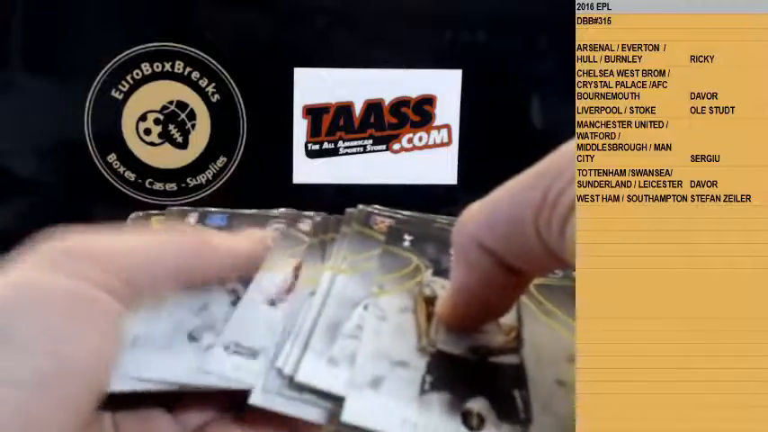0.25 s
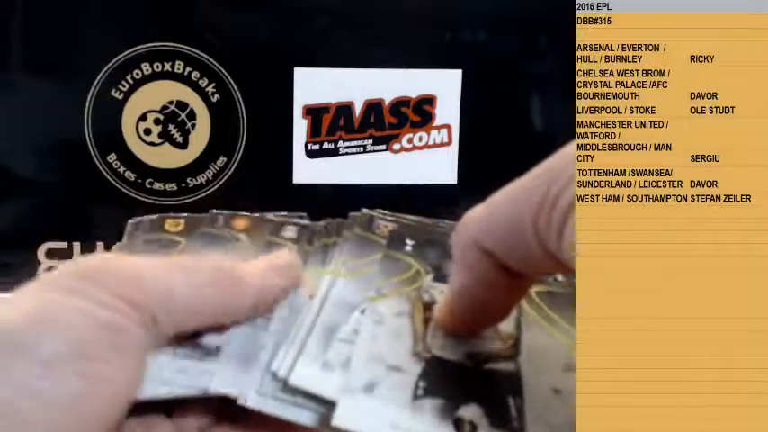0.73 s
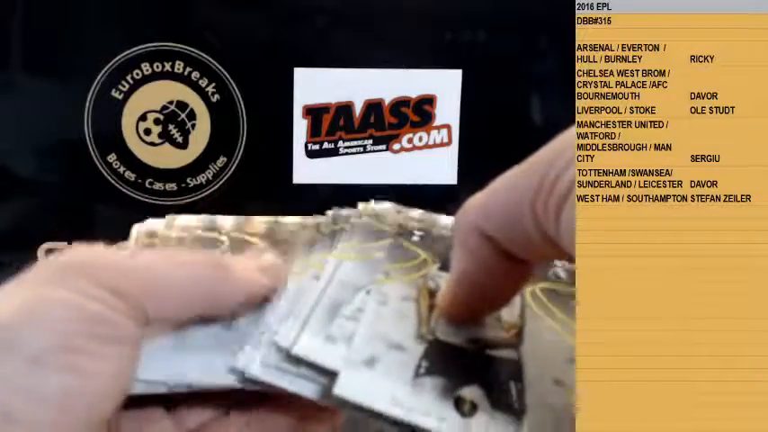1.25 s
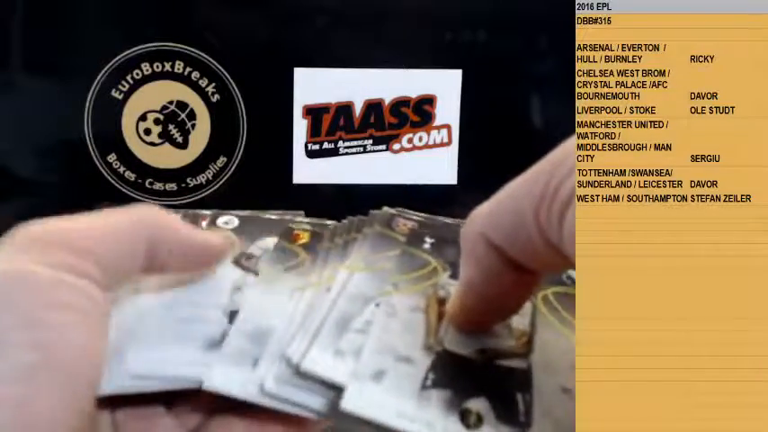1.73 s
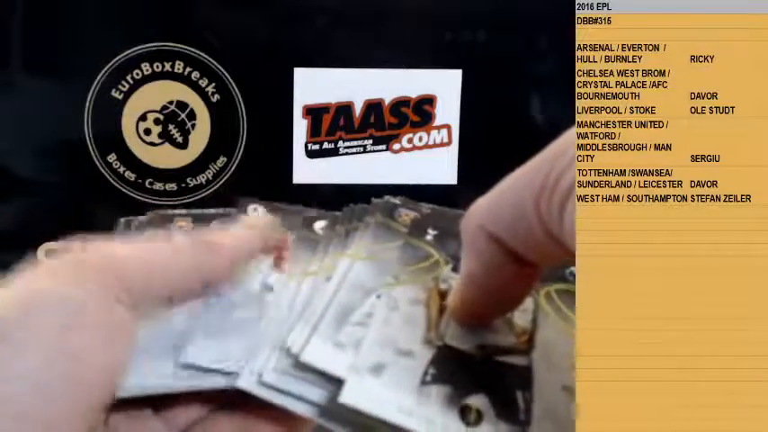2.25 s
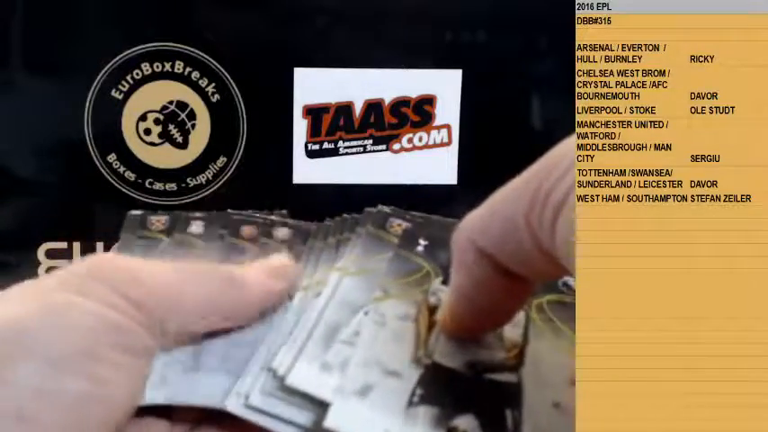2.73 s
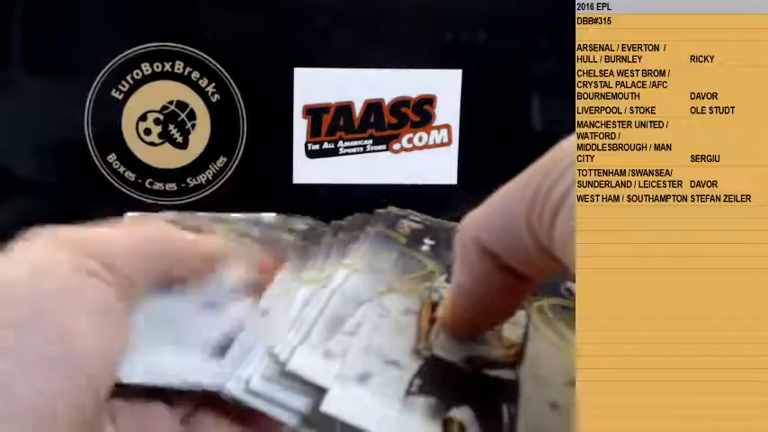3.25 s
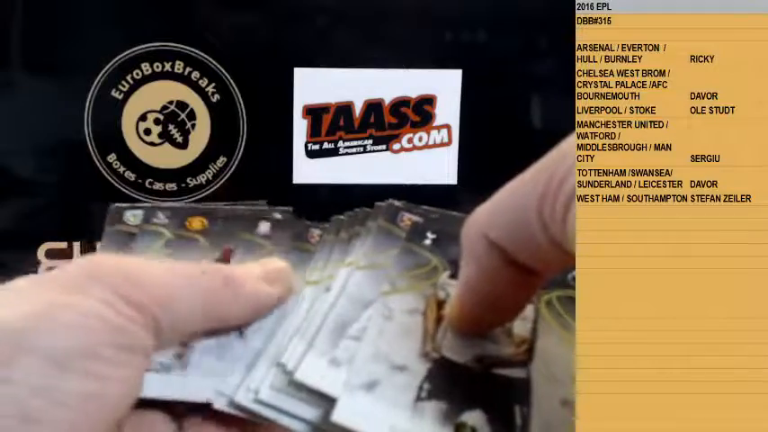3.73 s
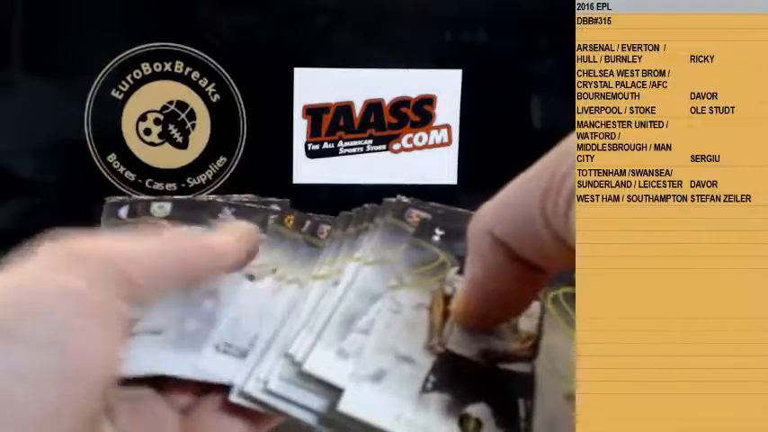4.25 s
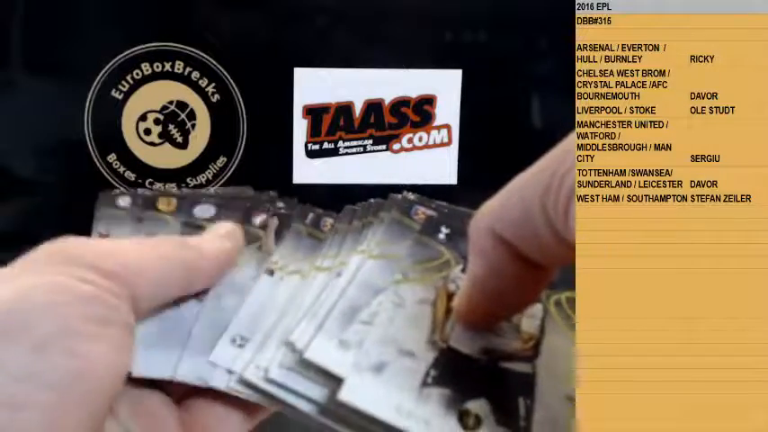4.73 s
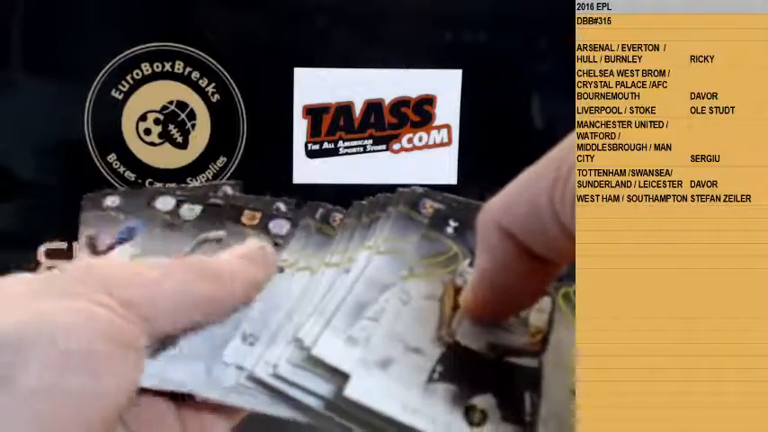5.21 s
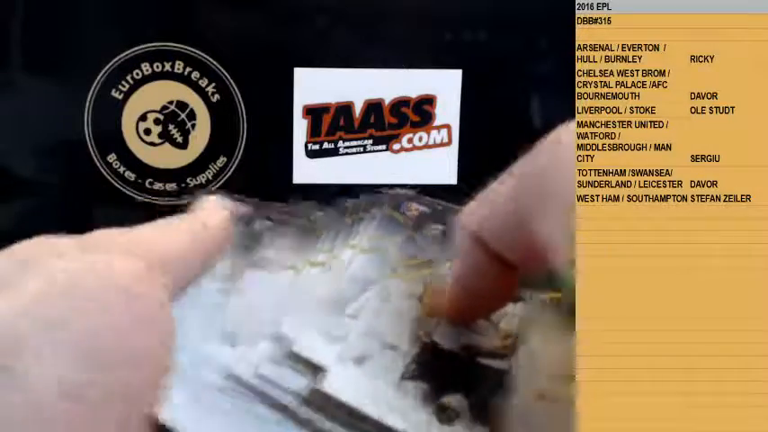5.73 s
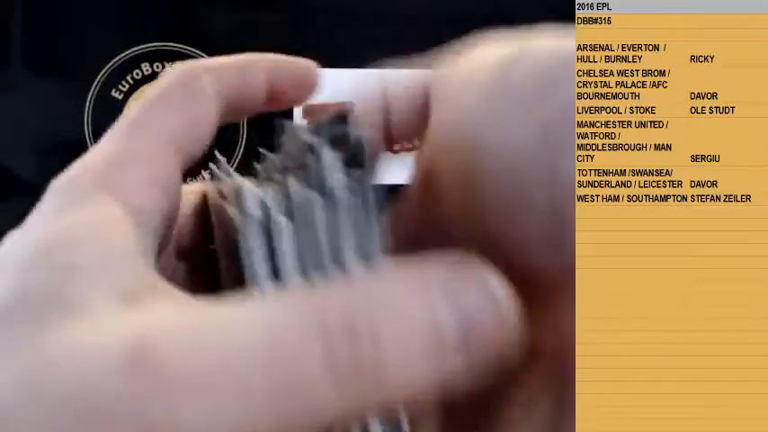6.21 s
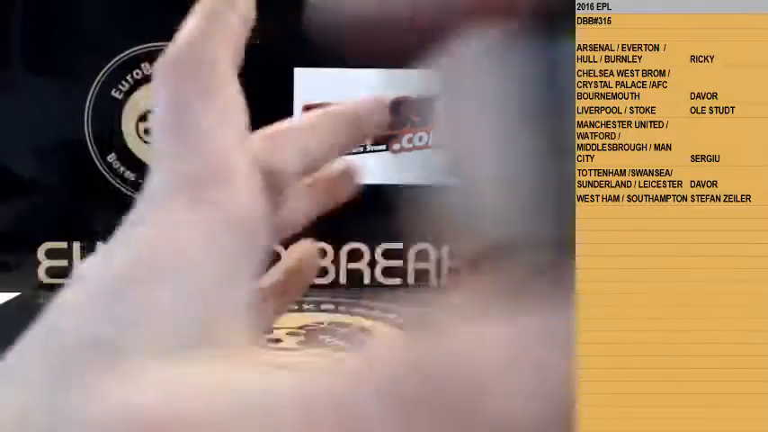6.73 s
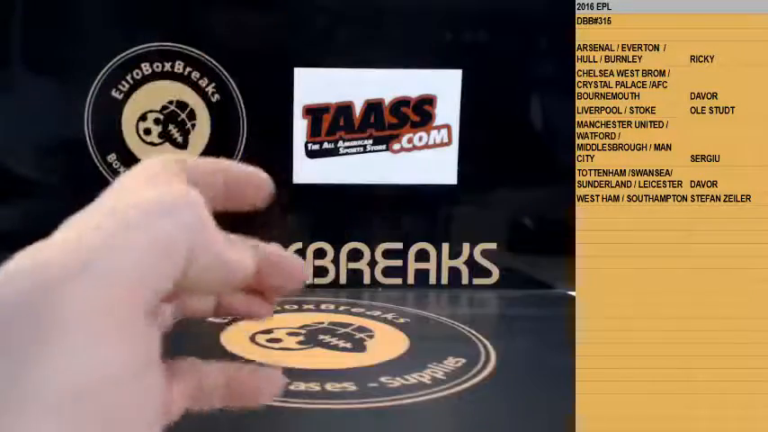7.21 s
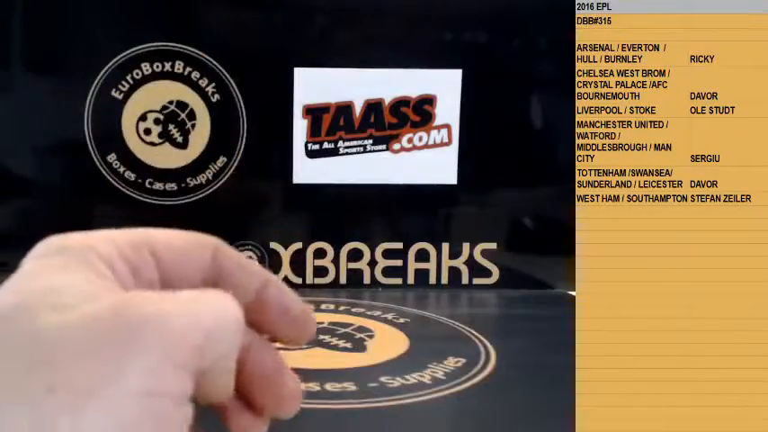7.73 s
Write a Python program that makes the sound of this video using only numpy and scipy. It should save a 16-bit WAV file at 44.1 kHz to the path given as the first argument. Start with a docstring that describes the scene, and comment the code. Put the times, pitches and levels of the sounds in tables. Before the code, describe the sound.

Trading cards rustle and tick faintly as they are flicked through, followed by one loud knock on a table in a quiet room.

```python
"""Leafing through trading cards

Close to a small stereo microphone in a quiet room, a thumb leafs through a fan of stiff cards.
Each card snaps free at its edge, pushes a puff of air and slides over the next. The stack is squared
up and knocked down on the ringing table, and the hand brushes away. A fan drones faintly behind."""
import sys
import numpy as np
from scipy import signal
from scipy.fft import rfft, irfft
from scipy.io import wavfile
from scipy.ndimage import map_coordinates

SR = 44100
rng = np.random.default_rng(int(sys.argv[2]) if len(sys.argv) > 2 else 0)


def wrap_up_sound(samples):
    """Save the sound to the file named by the first command line argument, as 16-bit audio."""
    columns = np.atleast_2d(samples).T
    # keep every value between -1 and 1, then stretch to whole-number steps
    tamed = np.clip(columns, -1, 1)
    steps = np.round(tamed * 32767).astype(np.int16)
    wavfile.write(sys.argv[1], SR, steps)


N = 351036
TIME, FREQS = np.arange(N) / SR, np.fft.rfftfreq(N, 1 / SR)

# Strokes of the thumb: (start [s], length [s], crest [share of length], crest level [dB],
# swell to the crest [dB], card body [dB re level], fizz [dB re level], stirred air [dB])
THUMB_STROKES = [ (0.0, 0.11, 0.091, -59, -22, -0.5, -1, -54),
                 (0.208, 0.13, 0.65, -61.5, -2.5, -3, -1, -51),
                 (0.311, 0.16, 0.073, -63.5, 0, -3, -4, -53.5),
                 (0.471, 0.23, 0.45, -58, 9, -4.5, -0.5, -56),
                 (0.796, 0.17, 0.33, -53.5, 8.5, -3.5, -1, -53.5),
                 (1.072, 0.22, 0.77, -59, 3.5, -2, -1, -56), (1.352, 0.16, 0.81, -62.5, -1.5, -6, -4, -60),
                 (1.486, 0.038, 0.38, -56, 21, 4.5, 7.5, -53),
                 (1.654, 0.18, 0.89, -60.5, 2.5, -4, -1, -53.5),
                 (1.933, 0.23, 0.09, -58.5, 3, -0.5, 3, -56.5), (2.24, 0.084, 0.17, -54, 6, -4, -1, -61),
                 (2.32, 0.095, 0.71, -60.5, 0, 2, 3, -56), (2.527, 0.23, 0.061, -60.5, 10, -1, 3, -53.5),
                 (2.814, 0.2, 0.57, -63, 3.5, 3.5, 2.5, -59), (3.118, 0.18, 0.45, -53, 25.5, -2, 1.5, -66),
                 (3.471, 0.12, 0.27, -58, 31, -2, 0.5, -45.5), (3.557, 0.36, 0.048, -68.5, 9, 2, 2, -70),
                 (3.9, 0.092, 0.4, -56, 20, 0.5, 3.5, -53), (3.976, 0.19, 0.072, -67.5, 0, 1, 1, -64),
                 (4.207, 0.16, 0.24, -55, 24, -4, 3, -48.5), (4.529, 0.095, 0.32, -62, 6, 0.5, 0.5, -58),
                 (4.597, 0.058, 0.63, -54, 19, -4, 3.5, -54), (4.819, 0.073, 0.43, -56.5, 12, -0.5, 1, -47),
                 (4.905, 0.12, 0.77, -63, 7, -0.5, 1, -62), (5.281, 0.16, 0.056, -56, 17, -3.5, -1, -53),
                 (5.38, 0.11, 0.62, -57, 28, -10, -6.5, -71), (5.498, 0.16, 0.74, -62, 5, -1, -4, -69),
                 (5.625, 0.21, 0.29, -52, 11.5, 1.5, 0, -56), (5.794, 0.11, 0.37, -50, 2, -1, -1.5, -67),
                 (5.894, 0.37, 0.43, -50.5, 14, -3, -0.5, -69), (6.196, 0.14, 0.67, -51.5, 10, -2, 5, -59),
                 (6.333, 0.096, 0.81, -47.5, 13.5, 1, 0.5, -62), (6.482, 0.11, 1, -57, 2, 0.5, 1.5, -53),
                 (6.644, 0.14, 0.71, -58, 15, 6.5, -2.5, -87), (6.769, 0.23, 0.57, -63, 8, 5, 1, -72),
                 (6.979, 0.14, 0.9, -58.5, 1.5, 2.5, -3, -53.5), (7.36, 0.11, 0.81, -53, 12, 2, -3, -40),
                 (7.461, 0.087, 0.33, -42, 6, -4.5, -8.5, -52),
                 (7.559, 0.097, 0.31, -50.5, 3, 0.5, -1.5, -68),
                 (7.64, 0.07, 0.58, -44.5, 20.5, -5, 3.5, -75), (7.72, 0.09, 0.43, -54.5, 8, 1, -9, -77),
                 (7.786, 0.065, 0.42, -46.5, 15, -3, -4.5, -67), (7.883, 0.11, 0.31, -57, 23, 6, -4.5, -70)]


def card_slides(catches_per_s=380, catch_db=-1, spread_db=4, judder_db=1.92, likeness=0.51):
    """Card rubs on card close to the microphone: smooth hiss and tiny catches under a juddering thumb."""
    # Colour of card on card: (frequency [Hz], spectral level [dB])
    rub_spectrum = [(260, -35.5), (450, 6.5), (569, -11), (692, -11), (942, -4.5), (1560, -8.5), (1900, -6),
                    (2050, -4.5), (2290, -1), (3110, 0), (3880, -6), (4790, -4), (6350, -3), (7370, -6.5),
                    (8540, -23), (11100, -44), (18800, -120)]
    catch_sizes = gain_of(spread_db * np.minimum(rng.exponential(1, N), 4))
    catches = catch_sizes * (rng.random(N) < catches_per_s / SR)
    hiss = rng.standard_normal((2, N))
    grit = hiss + gain_of(catch_db) * unit_rms(catches * rng.choice([-1., 1.], (2, N)))
    grit[1] = likeness * grit[0] + np.sqrt(1 - likeness ** 2) * grit[1]
    grit = coloured(grit * gain_of(judder_db * wander(rate_hz=28.8)), rub_spectrum)
    pressures = np.zeros((3, N))
    for start, length, crest, db, swell_db, body_db, fizz_db, _ in THUMB_STROKES:
        gains = gain_of(db + np.array([[body_db], [0], [fizz_db]]))
        add(pressures, start, gains * stroke_pressure(length, crest, swell_db))
    body, rub, fizz = band(grit, 583, 1887), band(grit, 1638, 4150), band(grit, 4220, 14000)
    return sum(pressure * unit_rms(part) for pressure, part in zip(pressures, (body, rub, fizz)))


def stroke_pressure(length, crest, swell_db, grip_s=0.0054, fade_db=13.5, let_go_s=0.012):
    """A stroke grips quickly, swells to its crest, fades as the card runs out, and lets go."""
    t = np.arange(0, length, 1 / SR)
    arch_db = np.interp(t / length, [0, np.clip(crest, .02, .98), 1], [-swell_db, 0, -fade_db])
    return gain_of(arch_db) * np.minimum(t / grip_s, 1) * np.minimum((length - t) / let_go_s, 1)


def edge_snaps(ring_t60=0.012, tick_t60=0.023, slap_t60=0.01, rise_s=0.00032):
    """A freed edge rings briefly over a dry tick and the dull slap of the card's face."""
    # Edges snapping free: (time [s], level [dB], ring pitch [Hz], slap [relative dB], tick [dB re ring])
    snaps = [(0.1811, -38.5, 2300, -37, -4.5), (0.205, -40, 3300, -25, 0), (0.2275, -35, 3400, -11, -25),
             (0.3181, -41, 3300, -9, 1), (0.4685, -35.5, 2390, -25, -16), (0.5046, -49, 3160, 4, 2),
             (0.586, -39, 3350, -10, 3), (0.635, -43.5, 2480, -27, 6), (0.795, -32.5, 2420, -24, -24),
             (0.831, -41, 2540, -10, -1), (0.8674, -43, 3400, -4, 5), (1.0659, -37.5, 2600, -22, -17),
             (1.0974, -41.5, 2240, -5, 8), (1.1919, -40.5, 3080, -10, -1), (1.213, -39.5, 3470, -10, -1),
             (1.229, -34, 3070, -18, 0.5), (1.4946, -41, 3820, -10, -5), (1.691, -40.5, 3000, -14, 3),
             (1.937, -32, 3020, -31, -2.5), (1.9452, -33, 3100, -11, 1), (1.9612, -38, 3040, -5, -8),
             (2.2232, -44.5, 3260, -14, -4), (2.2404, -38, 3070, -9.5, 6), (2.5307, -38, 3570, -18, -11),
             (2.544, -37, 3240, -4.5, 2), (2.813, -39.5, 3260, -15, 5), (2.8699, -43.5, 2910, -1, 0),
             (3.002, -42.5, 6150, -22, 1), (3.0877, -46, 5900, -28, 1), (3.118, -43.5, 3620, -8.5, -3),
             (3.2414, -45, 3210, 1.5, -4), (3.466, -38.5, 1890, -14, 6), (3.539, -43.5, 1770, -6.5, 26),
             (3.8732, -48, 2470, -8, 6), (3.9829, -49.5, 4160, 1.5, -6), (4.2059, -40.5, 1490, -11.5, 7),
             (4.251, -33, 6130, -31, -12), (4.5044, -41.5, 2060, -5, -6), (4.8213, -46, 3370, 0.5, -3),
             (4.8408, -40.5, 2030, -5.5, 4), (4.9177, -44.5, 1510, -18, 24), (5.237, -40, 1895, -12, -1),
             (5.2875, -45.5, 1650, -5.5, 4), (5.504, -49, 2920, -19, -23), (5.7946, -32.5, 1730, -13, -1),
             (5.897, -38, 2430, -32, -9), (6.0865, -41, 2200, -6.5, 6), (6.135, -35, 3600, -17, -1),
             (6.426, -35, 1840, -14, 4), (6.4351, -32.5, 2480, -11, 5), (6.496, -36.5, 1670, -28, 5),
             (6.77, -29.5, 3810, -17, 14)]
    out, t = np.zeros(N), TIME[:2048]
    for start, db, hz, slap_db, tick_db in snaps:
        ring = mode(t, hz, ring_t60) + 0.46 * mode(t, hz * 1.133, ring_t60)
        ring += 0.47 * mode(t, hz * 2, ring_t60 / 2)
        ring = unit_peak(ring * (1 - np.exp(-t / rise_s)))
        noise = rng.standard_normal(len(t))
        tick = unit_peak(band(noise * decay(t, tick_t60), 447, 6930))
        slap = unit_peak(band(noise * decay(t, slap_t60), 652, 1060))
        edge = unit_peak(ring + gain_of(tick_db) * tick)
        add(out, start + 0.00078, -gain_of(db) * (edge + gain_of(slap_db + 2) * slap))
    return out


def card_puffs(t60=0.15, rise_s=0.038):
    """A bent card swings back and pushes air at the microphone."""
    # Puffs from flexing cards: (time [s], level [dB], pitch [Hz])
    puffs = [(0.178, -44.5, 57.5), (0.477, -43, 42), (0.828, -42, 39.5), (1.068, -44, 50.3),
             (1.47, -45, 45), (1.924, -57, 37.2), (2.536, -43.5, 50.3), (2.925, -46.5, 54.3),
             (3.452, -57, 79), (4.196, -45, 60), (4.496, -42, 52.5), (4.813, -48, 98), (5.22, -47, 50),
             (5.996, -39.5, 38), (6.362, -43, 45.6), (6.489, -44, 38.6)]
    out, t = np.zeros(N), TIME[:SR // 4]
    for start, db, hz in puffs:
        swing = mode(t, hz, t60) * (1 - np.exp(-t / rise_s))
        add(out, start, gain_of(db - 1) * unit_peak(swing))
    return out


def skin_squeaks(half_width_hz=260):
    """Dry skin sticks and slips on card: a fuzzy note that swells and fades."""
    # Squeaks under pressure: (start [s], length [s], pitch [Hz], level [dB])
    squeaks = [(5.797, 0.08, 2000, -53), (7.495, 0.089, 1490, -48), (7.804, .026, 1500, -37),
               (7.8, .035, 2730, -48)]
    out = np.zeros(N)
    for start, length, hz, db in squeaks:
        note = band(rng.standard_normal(SR // 4), hz - half_width_hz, hz + half_width_hz)
        note = note[-round(length * SR):]
        add(out, start, gain_of(db) * unit_rms(note) * signal.windows.hann(len(note)))
    return out


def table_knocks(cushion=0.89, cushion_s=0.00078, radiated_hz=700, soft_hz=3600):
    """Each blow squeezes air out ahead of it, then rings the table top under the microphone."""
    # Blows on table and stack: (time [s], level [dB], centre of the push [Hz],
    # fall-off either side [dB/octave], room send [dB], contact time [s])
    blows = [(0.135, -43.5, 260, 55, -4.5, 0.0044), (0.56, -33.5, 496, 16, -7, 0.0018),
             (1.258, -50, 280, 40, 9.5, 0.003), (2.542, -43, 250, 12, -13, 0.00041),
             (2.869, -53, 685, 19, -11, .0005), (3.672, -49.5, 280, 40, 4, 0.0037),
             (4.207, -52, 290, -4, -20, 0.0011), (4.507, -39, 303, -5, 0, 0.00022),
             (4.823, -40, 200, 10, -24, 0.00045), (5.239, -49, 292, 13, -10, 0.0004),
             (6.434, -39, 363, 6, -2, 0.0014), (6.7198, -33.5, 1460, 22, -19, 0.00016),
             (6.771, -33, 297, 5.5, -12.5, 0.00065), (6.998, -36, 284, 1.5, -2.5, 0.00098),
             (7.021, -45, 91.5, 15, -15, 0.0053), (7.0908, 0.5, 276, 3.9, -7.5, 0.00085),
             (7.0937, -12.5, 890, 5.5, -33, 0.00099), (7.357, -20, 95, 7, -7, 0.0005),
             (7.428, -28.5, 370, 27, -10, 0.0063)]
    # Modes of the table top: (frequency [Hz], level [dB], t60 [s])
    table_modes = [(96.2, -10, 0.24), (106.4, -13.5, 0.2), (117.3, -27.5, 0.75), (129, -15.5, 0.23),
                   (164.5, -12.5, 0.13), (213, -16, 0.066), (253, -16, 0.066), (283, -1, 0.021),
                   (276, -31, 0.19), (321, -10.5, 0.031), (463, -12.5, 0.054), (566, 1, 0.016),
                   (568, -19, 0.02), (760, 6.5, 0.0068), (893, -9.5, 0.012), (1217, -5.5, 0.022),
                   (1740, -3, 0.011), (2220, -41, 0.026), (2450, -31, 0.039), (2680, -25, 0.034),
                   (3760, -33, .011), (5400, -43, .006)]
    # The table reaches the two capsules from different sides: (frequency [Hz], left lag [rad])
    left_lag = [(0, 0), (250, 0.45), (600, 1.02), (1100, 1.97), (1700, 1.14), (3000, 1.1), (8000, 1.2)]
    direct, sent = np.zeros(N), np.zeros(N)
    t, ahead = TIME[:SR // 2], TIME[:SR // 100]
    squeeze = unit_peak(np.exp(-ahead / cushion_s) * (1 - np.exp(-ahead / 0.00022)))[::-1]
    for start, db, centre_hz, fall_db, room_db, contact_s in blows:
        ring = sum(gain_of(mode_db - fall_db * abs(np.log2(hz / centre_hz))) * mode(t, hz, t60)
                   for hz, mode_db, t60 in table_modes)
        ring = unit_peak(ring * (1 - np.exp(-t / contact_s)))
        trapped_air = -cushion * np.exp(-contact_s / 0.0051) * squeeze  # a soft touch traps little
        blow = gain_of(db) * np.concatenate([trapped_air, ring])
        add(direct, start - len(ahead) / SR, blow)
        add(sent, start - len(ahead) / SR, gain_of(room_db) * blow)
    direct = signal.sosfilt(butter(1, 55, "high"), direct)
    direct = signal.sosfilt(butter(2, soft_hz), direct)  # paper and skin give no bright crack
    left = irfft(rfft(direct) * np.exp(-1j * curve_at(left_lag, FREQS)), N)
    # The wide top sends mostly its low notes into the room.
    sent = signal.sosfilt(butter(1, radiated_hz), band(sent, 147, 4100))
    return np.array([left, direct]) + room_reflections(sent)


def palm_rubs(low_hz=220, high_hz=620):
    """Soft skin dragging over the stack and the table gives a low, toneless rub."""
    # Drags of the palm: (start [s], length [s], level [dB])
    drags = [(6.26, 0.79, -57.5), (7.464, 0.28, -53), (7.735, 0.12, -64)]
    pressure = np.zeros(N)
    for start, length, db in drags:
        add(pressure, start, gain_of(db) * stroke_pressure(length, crest=0.32, swell_db=6))
    return pressure * unit_rms(band(rng.standard_normal(N), low_hz, high_hz))


def hand_wind(reach_s=0.025, slowing_db=15.5, settle_s=0.06):
    """Each stroke stirs the air in front of the microphone, over the faint rumble of the hands."""
    # Rumble of holding the cards: (time [s], level [dB])
    holding = [(0, -65.5), (4.8, -64), (5.1, -78), (6.0, -52.5), (6.5, -54.5), (6.8, -90), (7.96, -78)]
    motion = gain_of(np.interp(TIME, *np.transpose(holding)) - 1)
    for start, length, *_, stirred_db in THUMB_STROKES:
        # The hand moves just before the card slides, and slows over the stroke.
        t = np.arange(-reach_s, length + settle_s, 1 / SR)
        gust = np.interp(t, [-reach_s, 0, length, length + settle_s], [0, 1, gain_of(-slowing_db), 0])
        add(motion, start - reach_s, gain_of(stirred_db - 3) * gust)
    return motion * unit_rms(band(rng.standard_normal(N), 19.7, 77.7))


def at_card_position(pair):
    """Where the cards are held sets the balance and the delay between the two capsules."""
    # Path of the cards: (time [s], left over right [dB], left lag [samples])
    path = [(0, 2, -1.5), (5.3, 2.5, -2), (5.8, 0.5, 3), (6.5, 2, 1.5), (6.8, 0, 10.5), (7.5, -1, 8),
            (7.96, 1, 11.5)]
    times, balance_db, lag = np.transpose(path)
    side = gain_of(np.interp(TIME, times, balance_db) / 2)
    left = map_coordinates(pair[0], [np.arange(N) - np.interp(TIME, times, lag)], order=3)
    return np.array([left * side, pair[1] / side])


def room_reflections(x, delay_s=0.003, build_s=0.0022, echoes_per_s=3000):
    """Sparse reflections reach each capsule, every band dying away at its own speed."""
    # Decay of the room: (frequency [Hz], t60 [s])
    decay_times = [(100, 0.44), (300, 0.23), (1000, 0.29), (3000, 0.52), (8000, 0.24)]
    size = SR // 2
    taps = rng.choice([-1., 1.], (2, size)) * (rng.random((2, size)) < echoes_per_s / SR)
    taps *= np.clip((TIME[:size] - delay_s) / build_s, 0, 1)
    hz, t, spectra = signal.stft(taps, SR, nperseg=256)
    tail = signal.istft(spectra * decay(t, curve_at(decay_times, hz)[:, None]), SR, nperseg=256)[1]
    tail[1] += signal.sosfiltfilt(butter(2, 450), tail[0] - tail[1])  # long waves reach both alike
    return signal.fftconvolve(x[None], tail / np.linalg.norm(tail[0]), axes=1)[:, :N]


def room_tone(noise_db=-52.5, swell_db=3.5):
    """Behind the cards: room noise with an uneven rumble, a fan's drone and a thin electrical whine."""
    # Colour of the room noise: (frequency [Hz], spectral level [dB])
    noise_spectrum = [(20, 0.6), (50, 0.6), (80, -4), (130, -3), (195, -10), (290, -7), (400, -17),
                      (750, -20), (1000, -24), (1450, -32), (2500, -36), (4000, -40), (7700, -37),
                      (8900, -52)]
    # How alike the capsules hear it: (frequency [Hz], likeness [0-1])
    stereo_likeness = [(30, 0.7), (300, 0.91), (700, 0.093), (1500, 0.79), (3000, 0.44), (8000, 0.082)]
    # Tones of the fan and the whine: (frequency [Hz], rms waver [Hz], level [dB])
    tones = [(127, 5, -66), (163.5, 2.5, -66), (288.5, 4, -66.5), (648, 4, -79), (720, 2, -72),
             (8000, .5, -88.5)]
    left, unrelated = rng.standard_normal((2, N))
    likeness = curve_at(stereo_likeness, FREQS)
    right = irfft(likeness * rfft(left) + np.sqrt(1 - likeness ** 2) * rfft(unrelated), N)
    noise = gain_of(noise_db) * unit_rms(coloured(np.array([left, right]), noise_spectrum))
    rumble = signal.sosfiltfilt(butter(2, 250), noise)
    noise += rumble * (gain_of(swell_db * wander(rate_hz=20) - 4.5) - 1)
    drone = np.zeros(N)
    for hz, waver_hz, db in tones:
        pitch = hz + waver_hz * wander(rate_hz=7.49)
        drone += gain_of(db) * unit_rms(np.sin(2 * np.pi * np.cumsum(pitch) / SR))
    return noise + drone


def gain_of(db):
    """Decibels to gain."""
    return 10 ** (np.asarray(db) / 20)


def unit_rms(x):
    """Scales to rms 1."""
    return x / np.sqrt(np.mean(x ** 2) + 1e-20)


def unit_peak(x):
    """Scales to peak 1."""
    return x / (abs(x).max() + 1e-20)


def curve_at(points, hz):
    """Reads a table on a log-frequency axis."""
    point_hz, values = np.transpose(points)
    return np.interp(np.log(hz + 1), np.log(point_hz + 1), values)


def add(mix, start, sound):
    """Adds a sound to the mix at start seconds."""
    part = mix[..., max(round(start * SR), 0):][..., :sound.shape[-1]]
    part += sound[..., :part.shape[-1]]


def coloured(x, spectrum):
    """Filters x by a table of (frequency [Hz], level [dB])."""
    return irfft(rfft(x) * gain_of(curve_at(spectrum, FREQS)), N)


def butter(order, hz, kind="low"):
    """Sections of a filter with a flat passband."""
    return signal.butter(order, hz, kind, fs=SR, output="sos")


def band(x, low_hz, high_hz):
    """Band-pass filter."""
    return signal.sosfilt(butter(4, [low_hz, high_hz], "band"), x)


def wander(rate_hz):
    """Slow random drift of rms 1."""
    return unit_rms(irfft(rfft(rng.standard_normal(N)) / (1 + (FREQS / rate_hz) ** 4), N))


def decay(t, t60):
    """Falls 60 dB in t60 seconds."""
    return np.exp(-np.log(1000) * t / t60)


def mode(t, hz, t60):
    """A struck resonance."""
    return np.sin(2 * np.pi * hz * t) * decay(t, t60)


def lean_left(x, db):
    """Raises the left channel and lowers the right, each by db."""
    return x * gain_of([[db], [-db]])


def scene(card_room_db=-11):
    """Cards near the microphone, the table under it, the room around."""
    cards = card_slides() + edge_snaps()
    table = lean_left(table_knocks() + palm_rubs(), db=2)
    wind = lean_left(card_puffs() + hand_wind(), db=3)
    close = at_card_position(cards + skin_squeaks())
    reflections = gain_of(card_room_db) * room_reflections(cards[0])
    return close + reflections + table + wind + lean_left(room_tone(), db=3)


def record(dry, ceiling=0.97, edge_hz=8600):
    """The microphone rounds off the hardest knock, then cuts the top treble steeply."""
    rounded = dry / (1 + (dry / ceiling) ** 8) ** (1 / 8)
    low_pass = signal.firwin(101, edge_hz, window=("kaiser", 2.5), fs=SR)
    return signal.oaconvolve(rounded, low_pass[None], "same")


dry = scene()
out = record(dry)
wrap_up_sound(out)
```